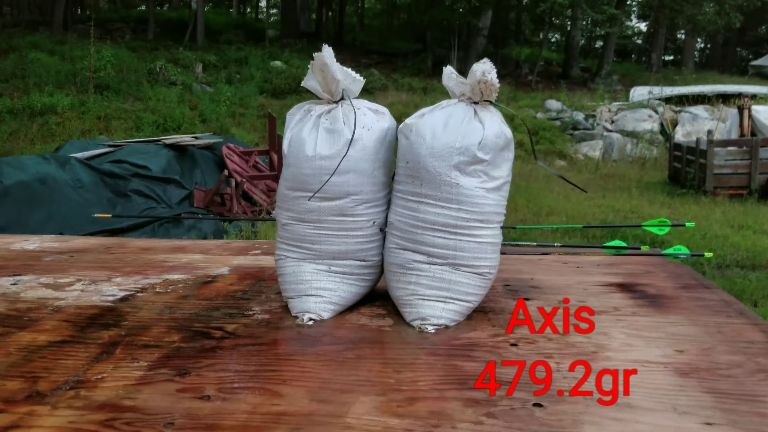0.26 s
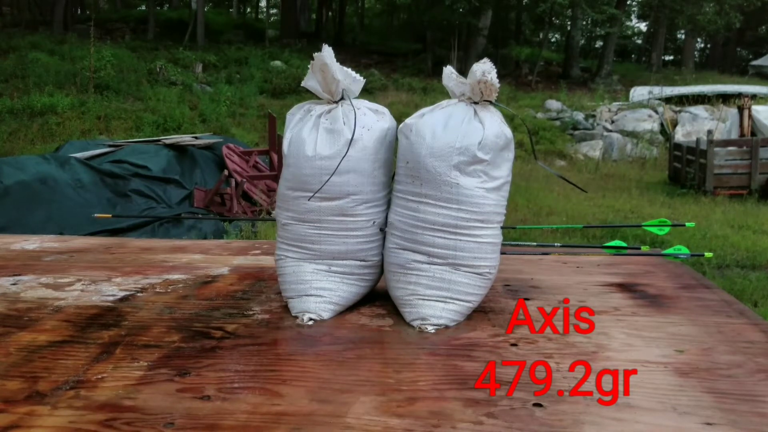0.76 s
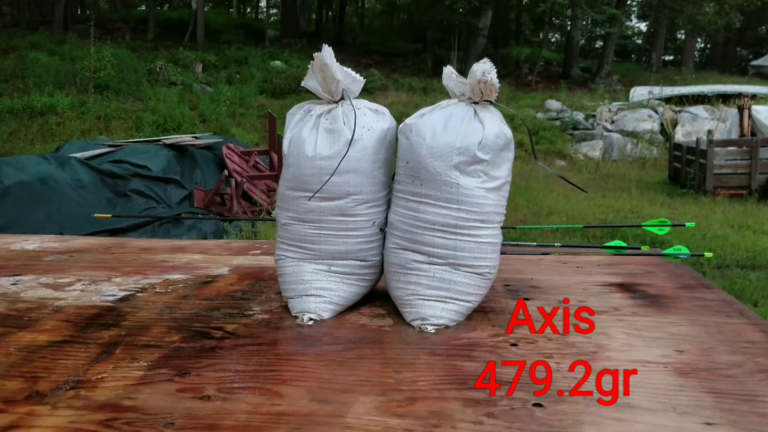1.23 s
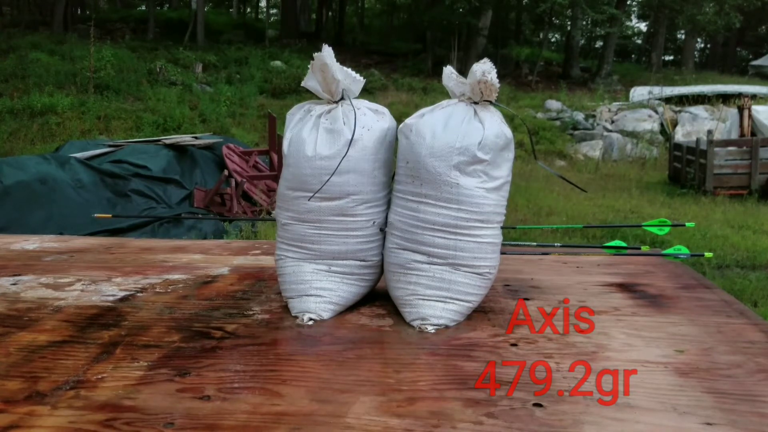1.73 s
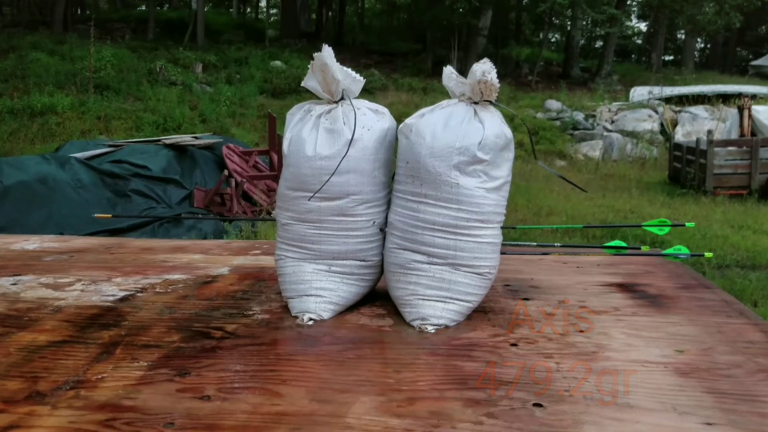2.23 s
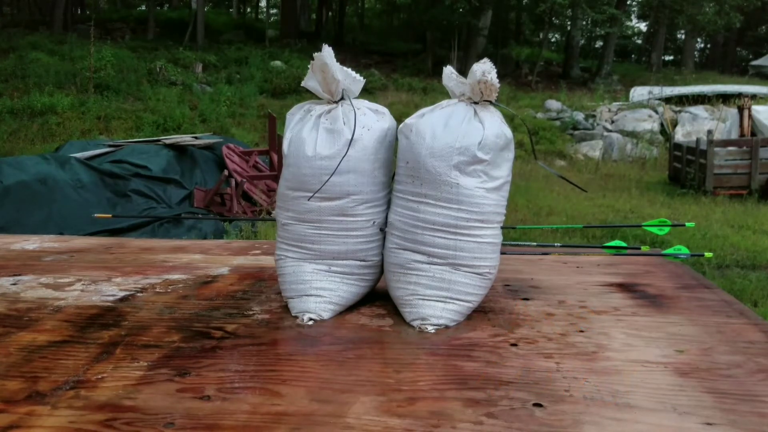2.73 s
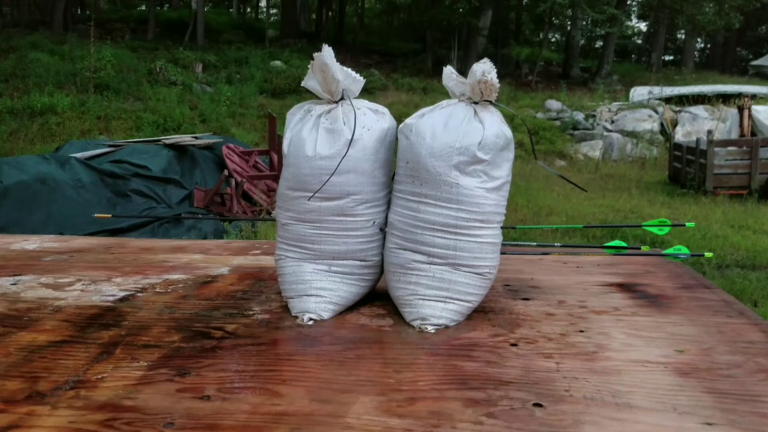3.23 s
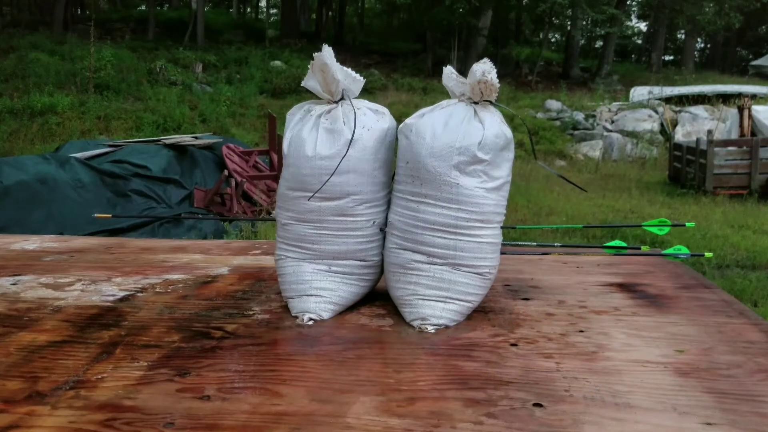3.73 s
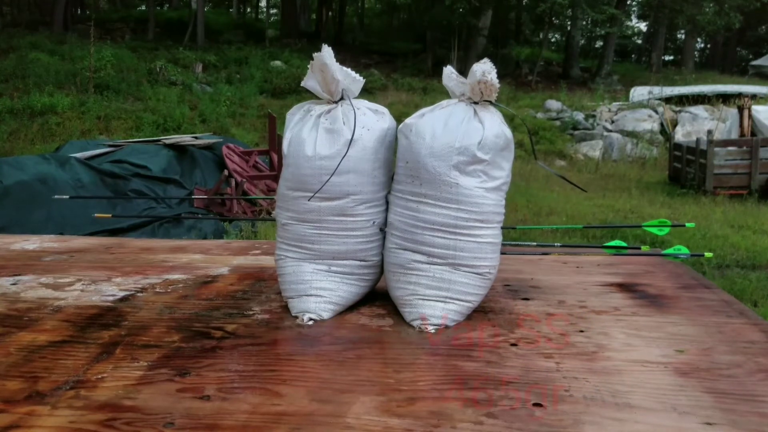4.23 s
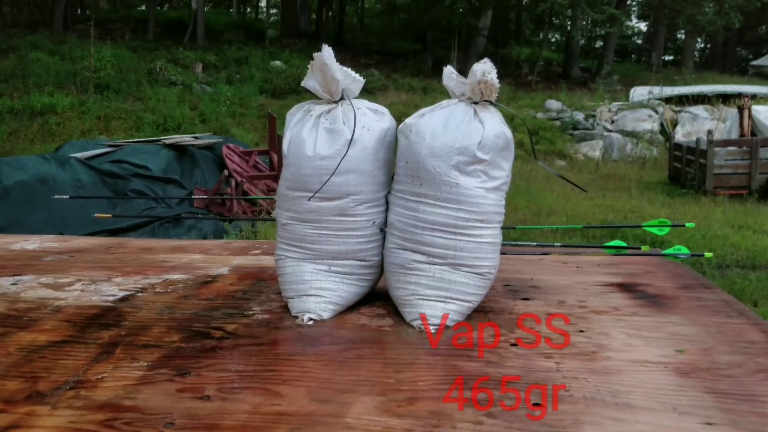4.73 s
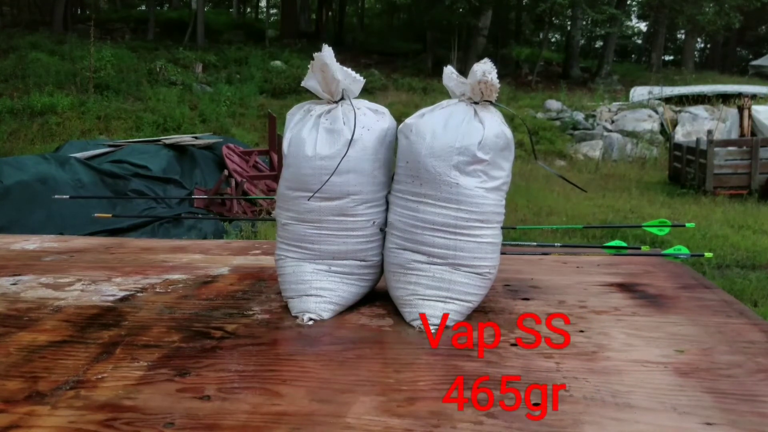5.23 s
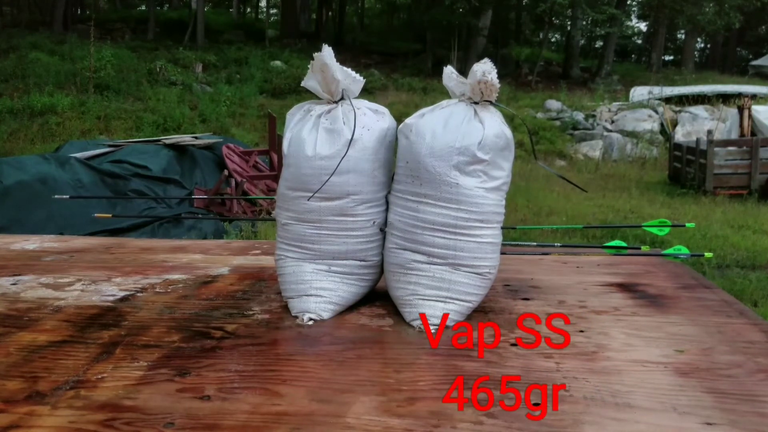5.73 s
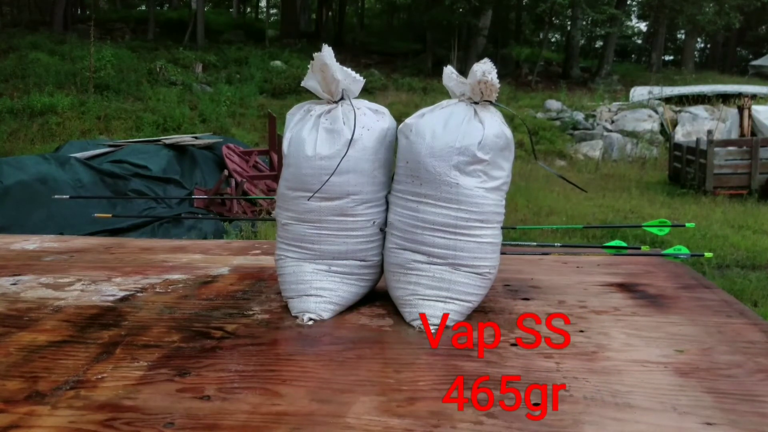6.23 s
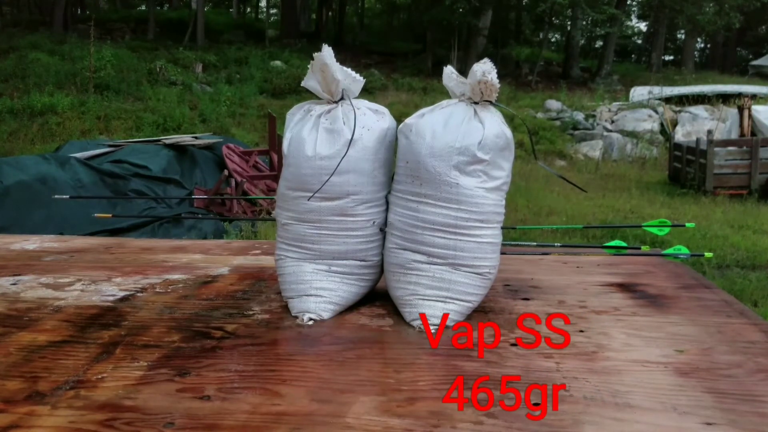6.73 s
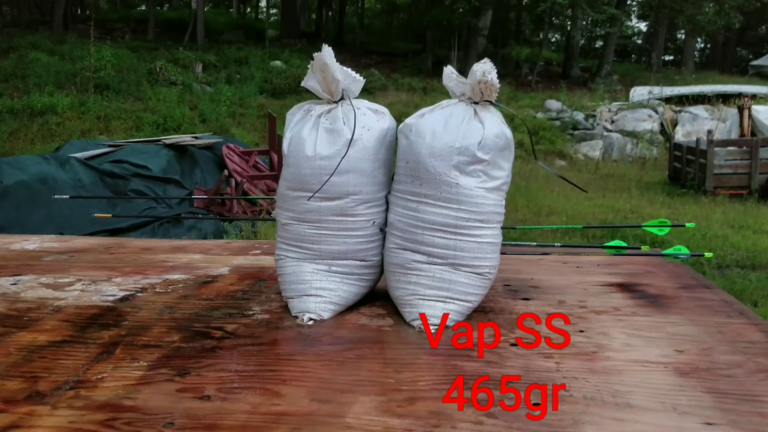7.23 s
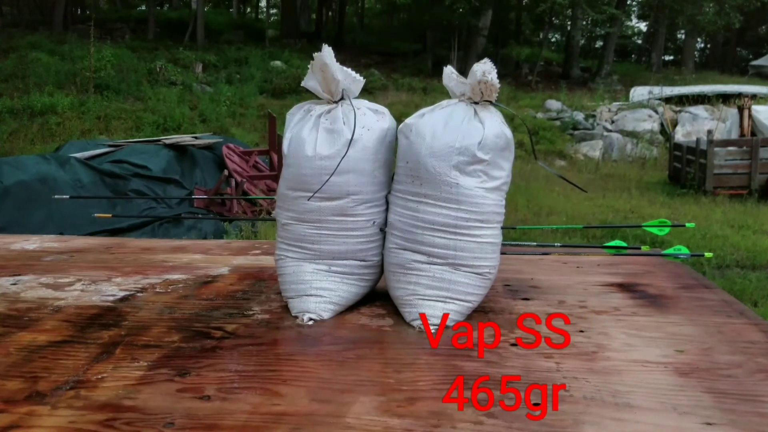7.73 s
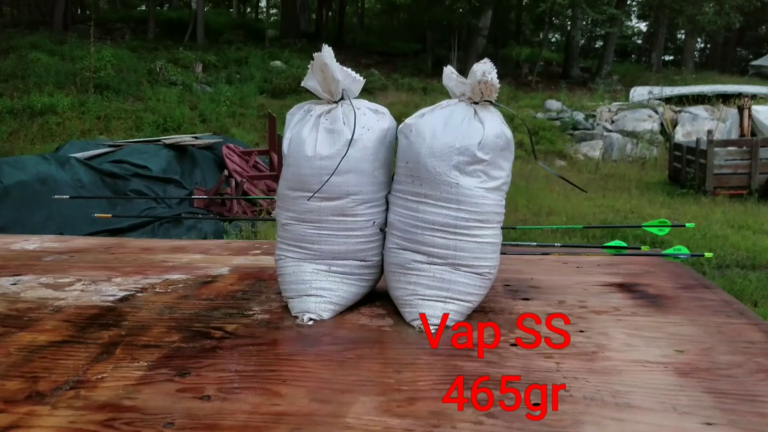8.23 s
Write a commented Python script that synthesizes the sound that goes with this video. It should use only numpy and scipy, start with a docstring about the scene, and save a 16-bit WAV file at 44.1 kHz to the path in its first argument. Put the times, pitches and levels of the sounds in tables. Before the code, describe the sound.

Summer yard insects buzz and chirp; midway a bow twangs, a split-second hiss ends in one loud cracking thud, then insects continue.

```python
"""A summer yard: a bow is loosed and the arrow hisses into two sandbags on a table near the microphone.
Bow and bags ring as dying sines; hiss, cracks and sand are shaped noise. Pulsed tones make near crickets,
noise strokes a katydid, coloured noise the cicadas, insect chorus, breeze and low traffic rumble.
A motor hums and a bird calls far off; the gain control sinks after the smack, then recovers."""
import sys
import numpy as np
from scipy import signal
from scipy.fft import rfft, irfft
from scipy.io import wavfile
from scipy.ndimage import uniform_filter1d

SR = 44100
rng = np.random.default_rng(int(sys.argv[2]) if len(sys.argv) > 2 else 0)


def to_wav(s):
    """Save 16-bit WAV."""
    ch = np.atleast_2d(s).T  # columns
    pcm = np.round(np.clip(ch, -1, 1) * 32767)  # PCM
    wavfile.write(sys.argv[1], SR, pcm.astype(np.int16))


N = 373968
TIME = np.arange(N) / SR
TREBLE_TOP_HZ = 14620  # upper edge of the noise layers

# treble level over time, scaled by each layer; falls abruptly near 2.7 s, then drifts:
# (time [s], level [dB])
TREBLE_LEVEL = [(0, 0), (2.66, -.5), (2.75, -4), (3.7, -4.5), (5.2, -3.5), (6.0, -4.5), (6.4, -3.5),
                (7.1, -3.5), (7.55, -2), (8.0, -5), (8.5, -2.5)]


def gain_of(db):
    """Amplitude factor of a level in dB."""
    return 10 ** (np.asarray(db) / 20)


def evened(x):
    """Scales to unit RMS."""
    return x / np.sqrt(np.mean(x ** 2) + 1e-20)


def read(points, hz):
    """Interpolates a (Hz, value) table over log frequency."""
    f, value = np.transpose(points)
    return np.interp(np.log(hz + 1), np.log(f + 1), value)


def add(mix, s, sound):
    """Adds a sound to the mix from s seconds on, cut at the end of the mix."""
    part = mix[:, round(s * SR):][:, :sound.shape[-1]]
    part += sound[..., :part.shape[1]]


def panned(x, db):
    """Sets the left-minus-right level difference in dB."""
    return x * gain_of([[db / 2], [-db / 2]])


def resonate(x, hz, width_hz):
    """One-pole resonance: shifts hz down to zero, smooths, and shifts back."""
    turn = np.exp(2j * np.pi * np.cumsum(hz * np.ones(x.shape[-1])) / SR)
    r = np.exp(-np.pi * width_hz / SR)
    smooth = signal.lfilter([1 - r], [1, -r], x / turn + 1e-18)
    return 2 * (turn * smooth).real


def ring(modes):
    """Dying sines from (Hz, dB, t60 s); neighbouring modes start in opposite directions."""
    t = TIME[:SR // 4]
    out = 0
    for k, (hz, db, t60_s) in enumerate(modes):
        out = out + (-1) ** k * gain_of(db - 60 * t / t60_s) * np.sin(2 * np.pi * hz * t)
    return out


def air(spectrum, lo_hz, hi_hz, patchy_db, size):
    """Unit-RMS stereo noise of a given colour, with patches that drift over time and frequency."""
    # (frequency [Hz], left-right likeness [-1..1])
    likeness = [(60, 1), (180, 0.93), (550, 0.3), (1650, 0.57), (4970, -0.089), (15000, -0.17)]
    # (frequency [Hz], left minus right [dB])
    lean = [(60, 2.5), (130, 1.0), (290, 2), (640, 1.0), (1410, 6.5), (3100, -1), (6820, -1), (15000, -1.5)]
    frames, hz = N * 4 // size + 5, np.fft.rfftfreq(size, 1 / SR)
    a, b, c, d, patches = rng.standard_normal((frames, len(hz), 5)).T
    patches = uniform_filter1d(patches, size=10, axis=0)
    patches = evened(uniform_filter1d(patches, size=12, axis=1))
    same = np.clip(read(likeness, hz), -1, 1)[:, None]
    left = a + 1j * b
    right = same * left + np.sqrt(1 - same ** 2) * (c + 1j * d)
    z = np.array([left, right])
    in_band = (hz >= lo_hz) & (hz < hi_hz)
    z *= gain_of(read(spectrum, hz)[:, None] + patchy_db * patches) * in_band[:, None]
    z *= gain_of(np.outer([.5, -.5], read(lean, hz)))[..., None]
    return evened(signal.istft(z, nperseg=size, noverlap=size * 3 // 4)[1][:, :N])


def background():
    """Traffic rumble, breeze and two bands of far insects swell with the gusts, over a steady hum."""
    # rumble: (frequency [Hz], density [dB per Hz])
    rumble = [(15, -39), (30, -17), (45, -8), (60, -1.5), (82, -4), (105, 1), (130, -2.5), (160, -13),
              (200, -15.5), (300, -18), (420, -19.5), (600, -24.5), (900, -28), (1300, -29.5)]
    # insect chorus: (frequency [Hz], density [dB per Hz])
    chorus = [(1750, -28), (1960, -18.5), (2330, -18), (2660, -9.5), (3000, -19.5), (3540, -26),
              (4090, -20), (4600, -12), (5200, -15.5), (6300, -20), (7670, -26), (9460, -31),
              (11500, -25.5), (14700, -22.5)]
    # slow swell: (time [s], rumble [dB], low chorus [dB])
    swell = [(0, -2, 0), (.6, 0, -.5), (1.3, -1.5, -.5), (2.2, -.5, .5), (2.75, 1, .5), (3.2, -1, -1),
             (4.3, -1, 0), (5, 3, 1), (6, 1, -.5), (6.8, 2, 0), (7.3, 0, 1), (7.9, -1, 0), (8.5, 0, 2)]
    # gusts: (time [s], half length [s], swell before each bed's share [dB])
    gusts = [(2.55, 0.11, 4.5), (4.3, .3, 1.5), (5.5, 0.31, 2), (6.212, .05, 5), (6.407, 0.048, 5.5),
             (6.997, 0.26, 2), (8.398, 0.22, 3.5)]
    # levels: (rumble [dB], breeze in the leaves [dB], low chorus [dB], high chorus [dB])
    beds_db = (-58, -66, -59.5, -57.5)
    # share of a gust that each bed follows: (rumble, breeze, low chorus, high chorus)
    gust_shares = (.6, 1, .7, 0.44)
    # far idling motor: (frequency [Hz], width [Hz], level [dB])
    hum = [(58, 2.5, -62), (112.8, 7.3, -65)]
    treble_share = 0.53

    gust_db = sum(db * np.exp(-((TIME - s) / half_s) ** 2) for s, half_s, db in gusts)
    at, rumble_db, chorus_db = np.transpose(swell)
    rumble_gain = gain_of(np.interp(TIME, at, rumble_db))
    chorus_gain = gain_of(np.interp(TIME, at, chorus_db))
    treble_gain = gain_of(treble_share * np.interp(TIME, *np.transpose(TREBLE_LEVEL)))
    layers = [rumble_gain * air(rumble, 0, 200, .8, size=2048),
              air(rumble + chorus, 200, 1800, 1.0, size=1024),
              chorus_gain * air(chorus, 1800, 3600, 1.7, size=1024),
              treble_gain * air(chorus, 3600, TREBLE_TOP_HZ, 0.98, size=1024)]
    out = np.zeros((2, N))
    for db, share, layer in zip(beds_db, gust_shares, layers):
        out += gain_of(db + share * gust_db) * layer
    for hz, width_hz, db in hum:
        waver = evened(resonate(rng.standard_normal(N), 0, width_hz))
        out += gain_of(db) * np.sin(2 * np.pi * np.cumsum(hz + .5 * width_hz * waver) / SR)
    return np.array([np.roll(out[0], shift=16), out[1]])  # right channel leads by 16 samples


def yard(x):
    """Random echo taps off trees and stacked timber, each band dying at its own speed."""
    # echo: (frequency [Hz], t60 [s])
    echo_t60 = [(100, 0.52), (500, .5), (2000, 0.4), (8000, .3), (14000, .2), (15000, .05)]
    taps = np.zeros((2, SR))
    at = np.arange(400, SR - 20, 20) + rng.integers(0, 20, (2, (SR - 401) // 20))
    np.put_along_axis(taps, at, rng.choice([-1., 1.], at.shape), 1)
    hz, t, z = signal.stft(taps, SR, nperseg=256)
    decay = gain_of(-60 * t / read(echo_t60, hz)[:, None])
    tail = signal.istft(z * decay, SR, nperseg=256)[1]
    tail = tail / np.linalg.norm(tail[0])
    return signal.fftconvolve(x.mean(0)[None], tail, axes=1)[:, :N]


def far_call():
    """A faint breathy bird call: narrow noise at the pitch and a weaker partial two thirds as high."""
    # (start [s], rise [s], hold [s], fade time constant [s], pitch [Hz], level of main partial [dB])
    s, rise_s, hold_s, fade_s, hz, db = (5.37, 0.1, 0.21, .12, 1535, -71)
    tone = np.zeros((2, N))
    for ratio, part_db in ((1, 0), (2 / 3, -4)):
        breath = resonate(rng.standard_normal((2, N)), ratio * hz, 50)
        tone += gain_of(part_db) * evened(breath)
    rise = np.clip((TIME - s) / rise_s, 0, 1)
    fade = np.exp(-np.maximum(TIME - s - rise_s - hold_s, 0) / fade_s)
    return gain_of(db) * tone * rise * fade


def cicadas():
    """A broad noise buzz in the trees that follows the treble level over time."""
    level_db, treble_share = -60.5, 1.4
    colour = [(5000, -24), (5700, 0), (6300, -2), (7600, -3), (8400, -5.5), (9300, -21.5)]  # (Hz, dB)
    buzz = air(colour, 4800, 9600, 1.4, size=512)
    return gain_of(level_db + treble_share * np.interp(TIME, *np.transpose(TREBLE_LEVEL))) * buzz


def katydid():
    """Each wing stroke is a short burst of top-octave noise; strokes slow as a phrase goes on."""
    # phrases: (first stroke [s], length [s], initial stroke rate [1/s], level before stroke shape [dB])
    phrases = [(.004, 2.3, 18.3, -73), (2.548, 0.17, 19, -74), (6.2, .37, 17.3, -77), (7.06, 0.78, 18, -79)]
    tiring_per_s = 0.26  # strokes a second lost each second
    strokes = np.zeros(N)
    for s, length_s, rate, db in phrases:
        t = TIME - s
        turns = rate * t - tiring_per_s * t ** 2 / 2
        stroke = np.exp(3.5 * np.cos(2 * np.pi * turns) - 2)
        strokes += gain_of(db) * stroke * (turns > -.5) * (t < length_s)
    colour = [(9000, -24), (11500, 0), (13000, 1), (14700, -1.0)]  # (Hz, dB)
    return strokes * air(colour, 8000, TREBLE_TOP_HZ, 1.1, size=256)


def crickets():
    """Chirps of three near-pure pulses whose pitch sags as the wings close."""
    # name: (nominal pitch [Hz], pulse length [s], pulse spacing [s], pitch sag [share], left minus
    # right [dB], the three pulses [dB]); the eager ones start their chirp strongly
    voices = {"low": (4160, .028, 0.049, 0.13, -1.5, (-14, -2.2, 0)),
              "low, eager": (4170, .028, .051, .12, -1.5, (-4, 0, 0)),
              "high, eager": (4650, .024, .043, .07, -3, (-3, -2, 0)),
              "mid": (4440, 0.0241, .040, .07, -2.5, (-20, 0, -4)),
              "high": (4635, .024, .0435, 0.075, -4, (-13, -1.4, 0))}
    # (cricket, near the middle of the last pulse [s], level before trim [dB])
    chirps = [("high", .450, -51), ("mid", .542, -56), ("high", .937, -51), ("mid", 1.04, -59),
              ("high, eager", 1.403, -52.5), ("mid", 1.472, -56), ("high", 1.839, -52), ("mid", 1.91, -57),
              ("high", 2.269, -52), ("mid", 2.358, -55), ("high", 2.693, -54), ("high", 2.885, -51),
              ("low", 2.921, -48), ("mid", 3.256, -55), ("high", 3.394, -53.5), ("low", 3.727, -46.5),
              ("high", 4.479, -51.5), ("high", 4.883, -51.5), ("mid", 5.254, -58), ("high", 5.313, -52),
              ("low", 5.521, -47.5), ("mid", 5.731, -55), ("high", 5.791, -52.5), ("mid", 6.167, -56),
              ("high", 6.259, -52.5), ("low", 6.392, -48.5), ("high", 6.780, -52.5), ("mid", 7.6, -57),
              ("mid", 7.353, -54), ("high", 7.378, -51), ("low, eager", 7.506, -46.5),
              ("high", 7.776, -52.5), ("mid", 7.883, -57), ("mid", 8.257, -56), ("high", 8.327, -52.5),
              ("low", 8.429, -48.5)]
    trim_db = -2.5
    out = np.zeros((2, N))
    for (name, s, db), chance in zip(chirps, rng.standard_normal((len(chirps), 3))):
        hz, length_s, spacing_s, sag, pan_db, pulses_db = voices[name]
        u = np.linspace(0, 1, round(length_s * SR))
        swell = np.sin(np.pi * u ** 0.69)
        for k, pulse_db in enumerate(pulses_db):
            pitch_hz = hz * (1.01 + .004 * chance[k] - sag * u ** 3.8)
            tone = np.sin(2 * np.pi * np.cumsum(pitch_hz) / SR)
            pulse = gain_of(db + pulse_db + trim_db) * tone * swell
            add(out, s + (k - 2) * spacing_s - 0.422 * length_s, panned(pulse, pan_db))
    return out


def shot():
    """The string slaps home, the limbs ring, and the vanes hiss and whistle in flight."""
    # bow limbs: (frequency [Hz], level [dB], t60 [s])
    limbs = [(166.2, 5, 0.026), (360, -4, .07), (550, -12, 0.03), (1950, -14, .05)]
    # string swings back: (time after release [s], level against the first ring [dB])
    rebounds = [(.012, -3), (.05, -11), (.058, -13), (.078, -15)]
    # arrow in the air: (time [s], hiss [dB], vane whistle [dB])
    flight = [(3.72, -40, -62), (3.74, -45.5, -58), (3.755, -47, -53), (3.768, -43, -60), (3.79, -50, -60),
              (3.81, -53, -52), (3.835, -51, -47.5), (3.846, -45, -47), (3.8545, -39.5, -53)]
    # hiss colour: (frequency [Hz], density [dB per Hz])
    hiss_colour = [(120, -44.5), (200, -15.5), (365, -8), (481, -18.5), (732, -6), (980, -14),
                   (4460, -12.5), (9100, -26.5), (14100, -27), (15700, -56.5)]
    release_s, string_db, slap_db, slap_t60_s = 3.7186, -34.5, -37.5, .05
    slap_rise_s, whistle_hz = 0.0026, 740

    out, t = np.zeros((2, N)), TIME[:2000]
    add(out, release_s, -gain_of(string_db) * ring(limbs))
    for delay_s, db in rebounds:
        add(out, release_s + delay_s, -gain_of(string_db + db) * ring(limbs))
    slap = resonate(rng.standard_normal((2, 2000)), 3200, 6000)
    slap = evened(resonate(slap, 3200, 6000))
    slap_shape = gain_of(slap_db - 60 * t / slap_t60_s) * np.minimum(t / slap_rise_s, 1)
    add(out, release_s, slap_shape * slap)

    s, hiss_db, whistle_db = np.transpose(flight)
    flutter = evened(resonate(rng.standard_normal(N), 0, 60))
    phase = 2 * np.pi * np.cumsum(whistle_hz * (1 + .008 * flutter)) / SR
    whistle = evened((1 + .2 * flutter) * np.sin(phase))
    hiss = air(hiss_colour, 150, TREBLE_TOP_HZ, 2.5, size=128)
    flying = (TIME > s[0]) & (TIME < s[-1])
    hiss = gain_of(np.interp(TIME, s, hiss_db)) * hiss
    whistle = gain_of(np.interp(TIME, s, whistle_db)) * whistle
    return out + flying * (hiss + whistle)


def impact():
    """Pushes ring the bags and table; cracks are bursts of coloured grit, and sand shifts after them."""
    # thumps of the bags on the table top: (time [s], level [dB], direction [+-1], push length [s])
    thumps = [(3.8559, -14, -1, 0.0017), (3.8592, -7, 1, .00025), (3.8633, -15, -1, 0.0016),
              (3.8661, -12.5, 1, 0.0014), (3.874, -15, 1, .0005), (3.883, -19, 1, 0.00059),
              (3.918, -27.5, 1, 0.0047), (3.937, -34.5, 1, .006), (3.954, -30, 1, .006),
              (3.9785, -17.5, 1, 0.0061), (4.392, -45, 1, .0003)]
    # bags and table: (frequency [Hz], level [dB], t60 [s])
    bag = [(168, -3.5, 0.036), (570, -2, 0.0091), (113, -27, 0.18), (1000, -8, 0.008), (40, -17, .06),
           (200, -28, .1)]
    # tip and shaft on cloth, sand and wood:
    # (time [s], dull part [dB], bright part [dB], t60 [s], left minus right [dB])
    crack_hits = [(3.8548, -20, -9, .0045, -1), (3.8591, -10, -22, .0045, -5), (3.8668, -11, -30, .006, -3),
                  (3.8738, -17.5, -24, .016, 2), (3.8763, -20, -30, .01, -2), (3.888, -14.5, -14, .016, -1),
                  (3.879, -34, -31, .05, 3), (3.8935, -27, -33, .025, .5), (3.917, -43, -60, 0.023, 1),
                  (3.9463, -55, -42, .008, 8), (4.2215, -38, -30.5, 0.01, 1), (4.5315, -60, -43, .005, 0)]
    # dull and bright part: (centre [Hz], width [Hz])
    grit_bands = [(2300, 2800), (10000, 9000)]
    crack_rise_s = .0004
    sand_db, sand_t60_s, grains_per_s = -38, .8, 300  # sand_db is against the dull part

    out, cracks, t = np.zeros((2, N)), np.zeros((2, N)), TIME[1:2001]
    for s, db, direction, length_s in thumps:
        push = np.hanning(max(round(length_s * SR), 3) + 2)  # a slow push rings only the low modes
        thud = direction * gain_of(db) * np.convolve(ring(bag), push / push.sum())
        add(out, s, panned(np.array([np.roll(thud, shift=3), thud]), 1.5))
    for s, dull_db, bright_db, t60_s, pan_db in crack_hits:
        for db, (hz, width_hz) in zip((dull_db, bright_db), grit_bands):
            uneven_db = 2.6 * rng.exponential(1, 250).repeat(8)  # steps of 8 samples
            noise = rng.standard_normal((3, 2000)) * gain_of(uneven_db)
            stereo = 0.78 * noise[0] + 0.63 * noise[1:]  # shared part plus one per side
            grit = resonate(resonate(stereo, hz, width_hz), hz, width_hz)
            shape = gain_of(db - 60 * t / t60_s) * np.minimum(t / crack_rise_s, 1) ** 2
            burst = evened(grit * shape) * np.sqrt(np.mean(shape ** 2))
            add(cracks, s, panned(burst, pan_db))
        is_grain = rng.random((2, 9000)) < grains_per_s / SR
        grains = rng.standard_normal((2, 9000)) * (.15 + is_grain * 3.5)
        sand_gain = gain_of(dull_db + sand_db - 60 * TIME[:9000] / sand_t60_s)
        add(out, s, sand_gain * evened(resonate(grains, 900, 2500)))
    mirrored = 0.27 * np.roll(cracks, shift=17, axis=1)  # off the table top
    return out + cracks + mirrored


def scene():
    """Sums all layers; only the impact gets yard echoes."""
    hits = impact()
    insects = katydid() + cicadas() + crickets()
    return hits + gain_of(-25) * yard(hits) + shot() + background() + insects + far_call()


def record(dry):
    """Microphone colour; gain control sinks after a loud peak, holds, then recovers; then band limit."""
    # microphone: (frequency [Hz], response [dB])
    response = [(20, -9), (45, -2.5), (80, 1), (14400, 1), (15000, -14.5), (15800, -17.5)]
    threshold_db, cut_share, lag_s, edge_hz = -31.5, 0.61, 0.18, 15890
    step, hold_steps = 441, 100  # 10 ms in samples; about 1 s

    hz = np.fft.rfftfreq(N, 1 / SR)
    dry = irfft(rfft(dry) * gain_of(read(response, hz)), N)
    power = abs(uniform_filter1d((dry ** 2).mean(0), size=step))
    power_db = 10 * np.log10(power + 1e-12)[::step]
    over_db = cut_share * np.maximum(power_db - threshold_db, 0)
    delayed = [np.pad(over_db, (k, 0))[:len(over_db)] for k in range(1, hold_steps)]
    held_db = np.max(delayed, 0)
    lag = np.exp(-.01 / lag_s)
    cut_db = signal.lfilter([1 - lag], [1, -lag], held_db)
    cut_db = signal.lfilter([1 - lag], [1, -lag], cut_db)
    level = dry / gain_of(np.interp(np.arange(N), np.arange(len(cut_db)) * step, cut_db))
    low_pass = signal.firwin(511, edge_hz, window=("kaiser", 9), fs=SR)
    return signal.oaconvolve(level, low_pass[None], "same")


dry = scene()
out = record(dry)
to_wav(out)
```